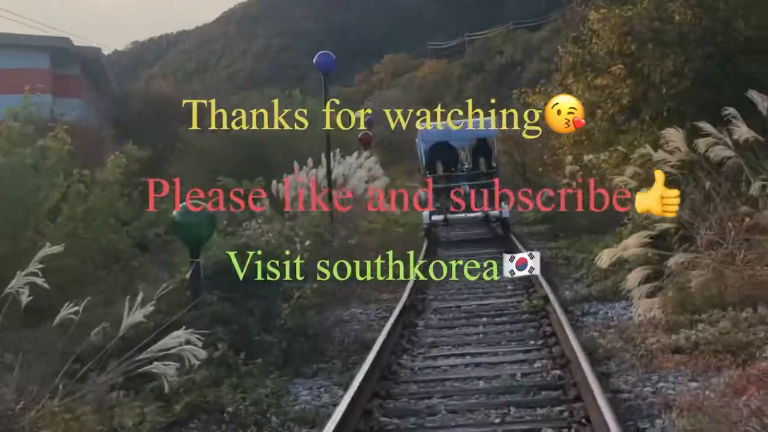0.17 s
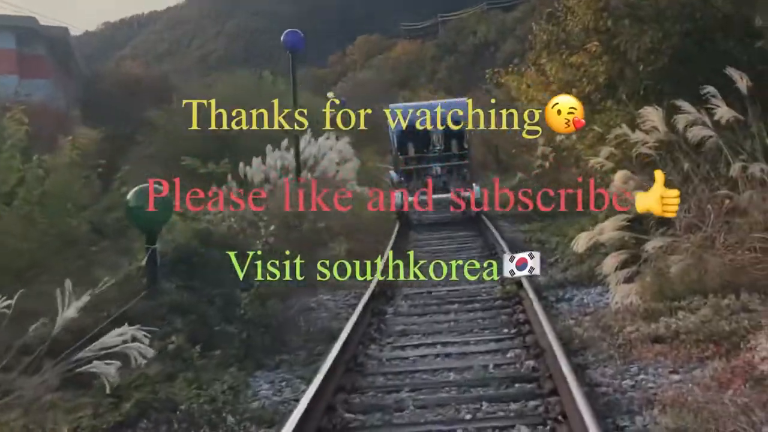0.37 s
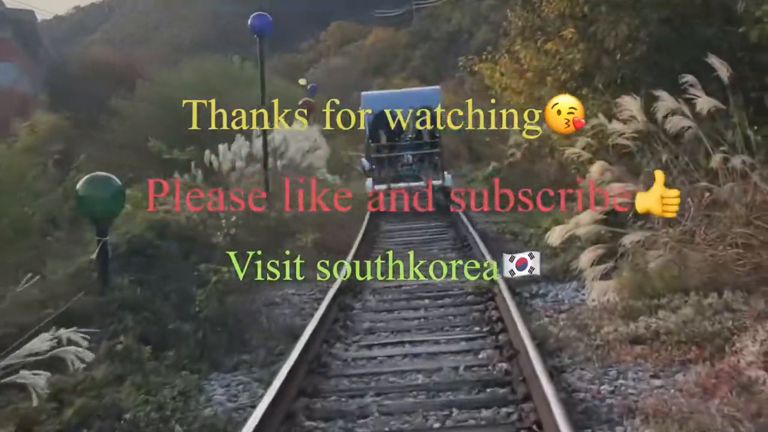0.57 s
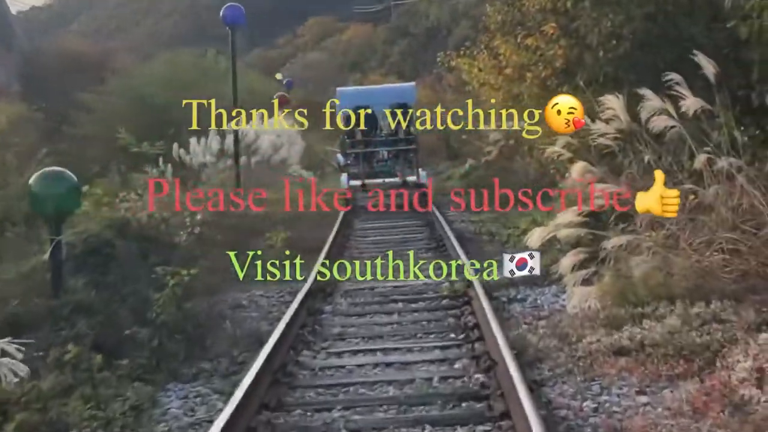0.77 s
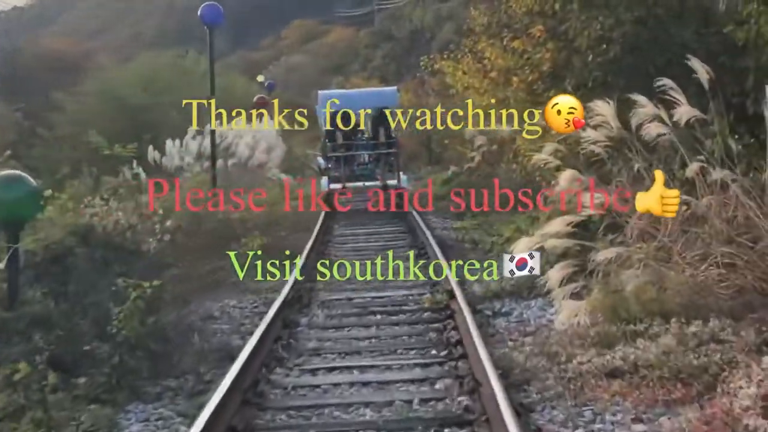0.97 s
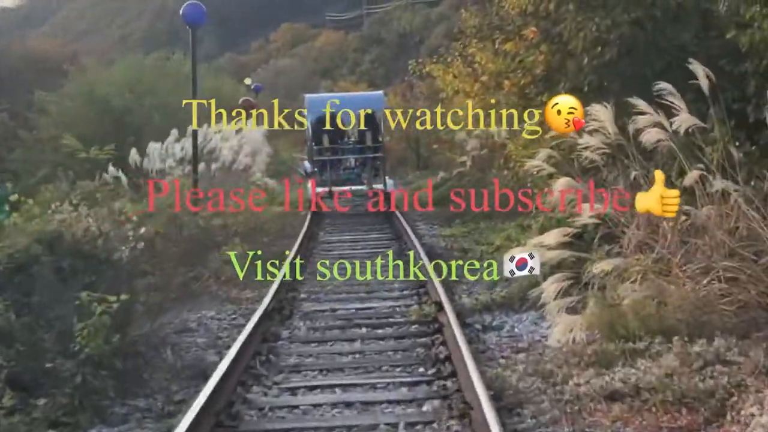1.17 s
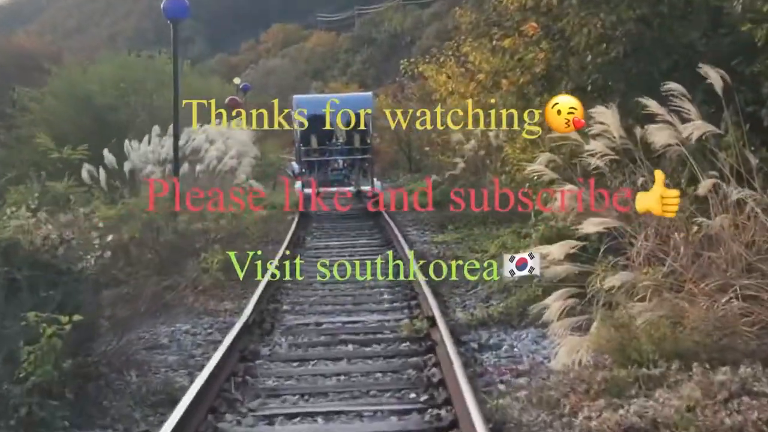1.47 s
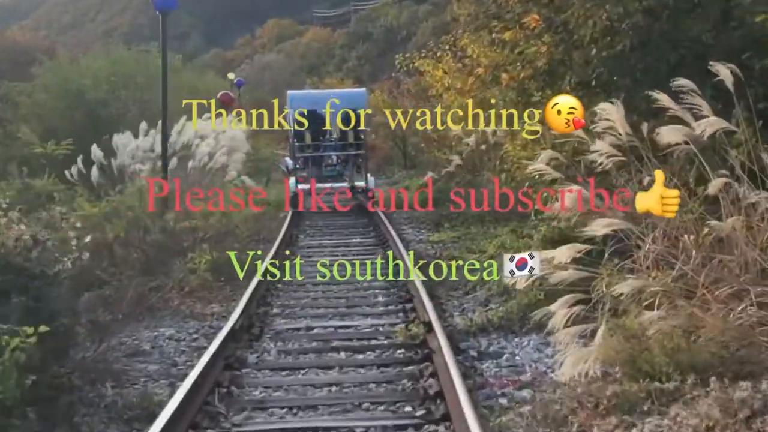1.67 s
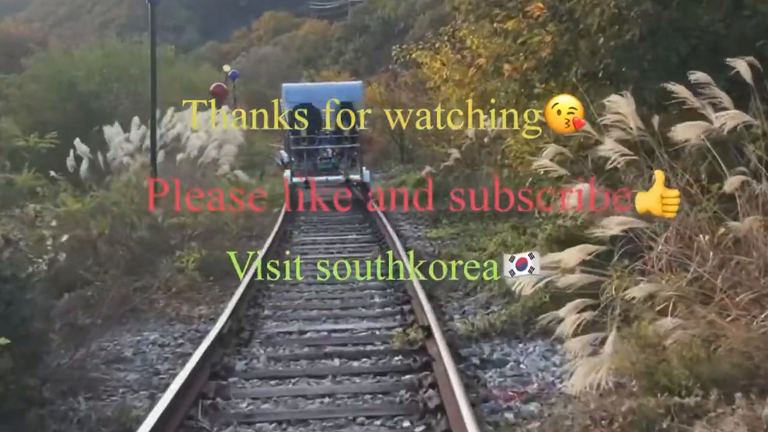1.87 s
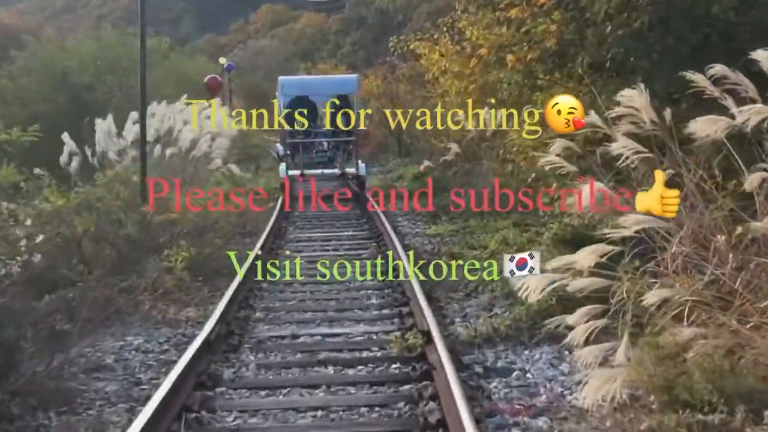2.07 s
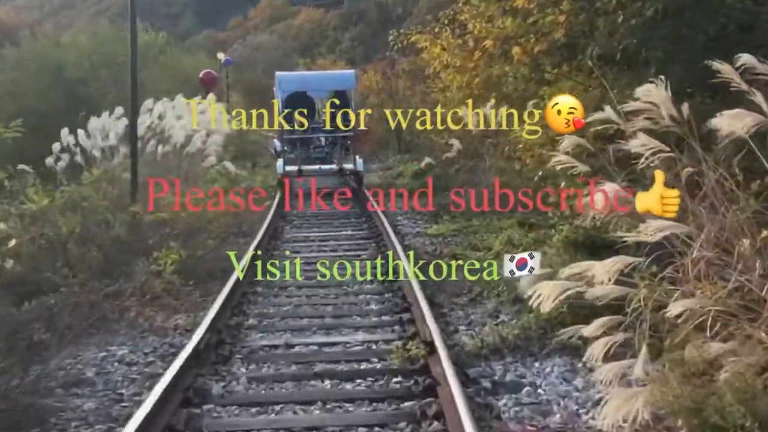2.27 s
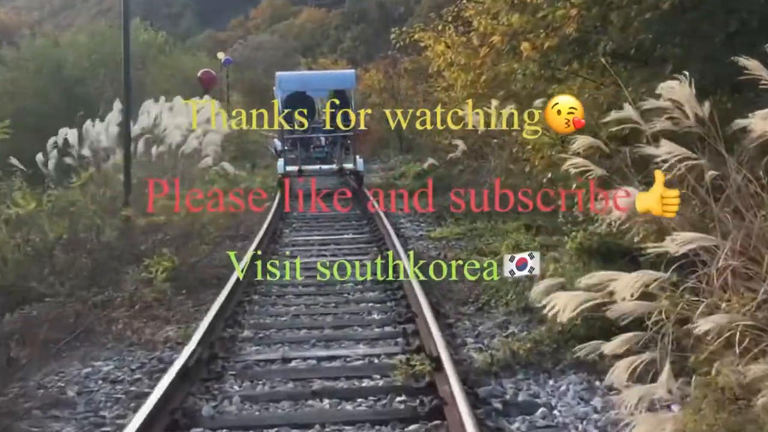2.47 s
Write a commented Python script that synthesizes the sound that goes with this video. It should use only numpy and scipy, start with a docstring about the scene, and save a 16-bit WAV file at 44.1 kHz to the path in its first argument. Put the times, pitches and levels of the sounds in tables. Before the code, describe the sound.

Close to one microphone in the open, a light rail cart rumbles and hums throughout; loose metal clacks at the start, a wheel thuds over a joint halfway, more rattles follow, then a brief high squeak.

```python
"""A low hum and rumble with ringing steel wheels: aboard a pedal cart on a country railway, close to one microphone.
Wavering tones in narrow noise make the frame's hum, coloured noise its rumble; gritty noise rings the wheels' modes.
Loose parts clack (noise bursts and ringing modes), tick, scuff and ping; single wheel tones swell up briefly.
A wheel knocks in a rail joint (decaying sines), and late on a dry joint squeaks (roughened metal modes)."""
import sys
import numpy as np
from scipy import signal
from scipy.fft import rfft, irfft, next_fast_len
from scipy.io import wavfile
from scipy.ndimage import map_coordinates

SR = 44100
rng = np.random.default_rng(int(sys.argv[2]) if len(sys.argv) > 2 else 0)


def output_pcm(signal):
    """Save a mono or channel-first signal as 16-bit PCM at the path in sys.argv[1].

    Samples are clipped to [-1, 1] before scaling.
    """
    pcm = np.clip(np.atleast_2d(signal).T, -1, 1) * 32767
    wavfile.write(sys.argv[1], SR, np.round(pcm).astype(np.int16))


def elevation(decibels):
    """Turn decibel levels (scalar or array-like) into linear amplitude ratios."""
    levels = np.asarray(decibels, float)
    return 10 ** (levels / 20)


N = 115983
T = np.arange(N) / SR


def unit(x):
    """Scales x to an rms of 1."""
    return x / np.sqrt(np.mean(x ** 2) + 1e-20)


def wobble(rate):
    """A smooth random curve with rate knots a second."""
    knots = rng.standard_normal(int(N * rate / SR) + 4)
    return map_coordinates(knots, [T * rate])


def filtered(x, response):
    """x shaped by a complex response of frequency."""
    m = next_fast_len(N + SR // 2)
    return irfft(rfft(x, m) * response(np.fft.rfftfreq(m, 1 / SR)), m)[:N]


def colour(points):
    """Gain drawn through (f/Hz, level/dB) points on a log frequency axis."""
    f, db = np.transpose(points)
    return lambda hz: elevation(np.interp(np.log(hz + 1), np.log(f), db))


def resonances(modes):
    """Causal response of (f/Hz, width/Hz, level/dB) resonances, with alternating signs."""
    def response(f):
        total = 0
        for k, (centre, width, db) in enumerate(modes):
            damping = 1j * f * width
            total = total + (-1) ** k * elevation(db) * damping / (centre * centre - f * f + damping)
        return total
    return response


def curves(rows):
    """One value per sample for each column after the time."""
    s, *cols = np.transpose(rows)
    return [np.interp(T, s, c) for c in cols]


def bursts(rows, points, rise_s):
    """Coloured noise that jumps up at each (t/s, level/dB, t60/s) and dies away."""
    envelope = np.zeros(N + SR)
    t = T[:SR // 4]
    for s, db, t60 in rows:
        decay = elevation(db - 60 * t / max(t60, .004))
        envelope[round(s * SR):][:len(t)] += decay * (1 - np.exp(-t / rise_s))
    return envelope[:N] * unit(filtered(rng.standard_normal(N), colour(points)))


def drone(rows, noise_db, width_hz, waver_hz):
    """A frame mode kept ringing: a tone of wandering pitch in narrow noise, noise_db against the tone."""
    hz, db = curves(rows)
    tone = np.sqrt(2) * np.sin(2 * np.pi * np.cumsum(hz + waver_hz * wobble(16)) / SR)
    narrow = resonances([(hz.mean(), width_hz, 0)])
    # the resonance is applied twice, for steeper skirts
    noise = unit(filtered(rng.standard_normal(N), lambda f: narrow(f) ** 2))
    return elevation(db) * unit(tone + elevation(noise_db) * noise)


def scrape(s, hz, db, t60, rise_s):
    """One metal mode rubbed into a ring, rough in level and pitch, that swells and dies."""
    rough_db, rough_pitch, rough_per_s = 4, .018, 650  # pitch as a fraction of hz
    t = (T - s).clip(0)
    phase = 2 * np.pi * hz * np.cumsum(1 + rough_pitch * wobble(rough_per_s)) / SR
    level = elevation(db - 60 * t / t60 + rough_db * wobble(rough_per_s))
    swell = 1 - np.exp(-(2 * t / rise_s) ** 2)
    return level * swell * np.sin(phase)


def frame_hum():
    """The shaken frame keeps three of its modes ringing: hum, boom and a broad drumming."""
    # Wandering rings of the frame, lowest first: t/s, f/Hz, level/dB
    hum_path = [(0.0, 109, -58), (0.09, 111.4, -37), (0.25, 112, -25), (0.28, 115, -42),
                (0.34, 103.4, -25.5), (0.39, 106.7, -54), (0.45, 112.7, -27), (0.5, 112.5, -36),
                (0.56, 111.9, -26), (0.6, 111.7, -30.5), (0.78, 105.4, -25.5), (0.8, 105, -40),
                (0.86, 105.2, -30), (0.89, 106.5, -46), (0.97, 105.4, -27), (0.98, 105.5, -41),
                (1.03, 113, -31), (1.11, 109.7, -45), (1.13, 111.2, -31), (1.17, 104.2, -42),
                (1.22, 109.8, -28), (1.49, 112.7, -32), (1.54, 117.5, -37), (1.69, 111.0, -27),
                (1.82, 111.5, -21), (1.85, 112, -30.5), (2.05, 117.7, -35.5), (2.09, 112.1, -34),
                (2.15, 111.3, -30), (2.23, 114.9, -34), (2.31, 110.4, -22), (2.37, 110.8, -38),
                (2.39, 109.0, -24.5), (2.45, 103, -31), (2.57, 103.1, -32.5), (2.63, 108.5, -29)]
    boom_path = [(0.0, 226.5, -33.5), (0.08, 244, -30.5), (0.12, 260.4, -42), (0.19, 241.2, -26.5),
                 (0.21, 250.3, -49), (0.23, 240.1, -25.5), (0.36, 247.4, -50), (0.38, 236.6, -27),
                 (0.53, 234.5, -26.5), (0.56, 247, -18.5), (0.61, 254.7, -41), (0.64, 258.5, -20.5),
                 (0.73, 260.0, -39), (0.82, 226.9, -26), (0.94, 227.2, -33), (1.03, 251, -26.5),
                 (1.11, 259.6, -39), (1.12, 249.5, -19), (1.16, 236.8, -38), (1.17, 229.5, -21.5),
                 (1.24, 228.6, -31), (1.31, 229.3, -29), (1.37, 249.5, -39), (1.41, 226.2, -29),
                 (1.47, 216.9, -45), (1.56, 247.4, -22.5), (1.58, 250.4, -49), (1.65, 241, -12),
                 (1.66, 239.3, -42), (1.68, 238.5, -15), (1.73, 252, -33), (1.74, 255.7, -16.5),
                 (1.77, 253, -31), (1.79, 244.8, -20.5), (1.86, 244.5, -24.5), (1.95, 225.7, -26.5),
                 (2.12, 235, -32), (2.23, 215.6, -30), (2.34, 243.9, -43), (2.39, 241.3, -18.5),
                 (2.41, 239.6, -38), (2.49, 257.7, -20.5), (2.53, 258.4, -50), (2.54, 255.2, -18),
                 (2.62, 261.3, -40), (2.63, 263, -29)]
    drum_path = [(0.0, 450, -34), (0.15, 496.4, -32.5), (0.68, 515.7, -32.5), (0.78, 556.3, -29),
                 (0.83, 445.7, -30), (0.91, 526.4, -29), (1.1, 490.8, -33), (1.12, 549, -36),
                 (1.21, 537.7, -25.5), (1.27, 455.5, -36), (1.3, 521.3, -24.5), (1.34, 448.6, -35.5),
                 (1.38, 522.2, -39.5), (1.49, 509.7, -24.5), (1.57, 569, -32), (1.6, 498.7, -27.5),
                 (1.84, 489.3, -31.5), (1.88, 447, -34), (1.98, 503.6, -29.5), (2.17, 518.2, -24.5),
                 (2.2, 446.4, -30.5), (2.35, 566, -35.5), (2.4, 504.7, -30.5), (2.51, 561.2, -30.5),
                 (2.59, 472.2, -44), (2.63, 551.6, -37)]
    hum = drone(hum_path, noise_db=-9, width_hz=26, waver_hz=2)
    boom = drone(boom_path, noise_db=-8, width_hz=50, waver_hz=4)
    drum = drone(drum_path, noise_db=-3, width_hz=90, waver_hz=10)
    return hum + boom + drum


def wheel_ring():
    """Even roughness and random bumps on the tread drive the wheel modes, each singing up on its own."""
    # Wheel modes, relative levels: f/Hz, width/Hz, level/dB
    wheel_modes = [(1863, 85, 1.5), (2048, 87, 2), (2113, 97, 0.5), (2254, 170, -0.5), (2440, 100, 1),
                   (2494, 60, -0.5), (2635, 24, -1.5), (3144, 110, -12), (3470, 93, -9.5), (3750, 120, -8),
                   (4630, 21, -12), (4800, 57, -39), (5590, 91, -16)]
    grit_per_s, grit_spread_db, grit_db = 540, 2.5, -5  # grit_db is against the even roughness
    swell_db, swells_per_s = 2.8, 45
    bumps = rng.random(N) < grit_per_s / SR
    sizes = elevation(grit_spread_db * rng.exponential(1, N).clip(0, 3.5))
    grit = bumps * sizes * rng.choice([-1, 1], N)
    tread = rng.standard_normal(N) + elevation(grit_db) * unit(grit)
    ring = np.zeros(N)
    for k, mode in enumerate(wheel_modes):
        drive = tread * elevation(swell_db * wobble(swells_per_s))
        ring += (-1) ** k * filtered(drive, resonances([mode]))
    return unit(ring)


def rolling():
    """Rough wheels rolling: the frame's hum and noisy rumble, the wheel ring, a hiss and a flickering treble."""
    # Course of the rolling: t/s, rumble level/dB, wheel ring and hiss level/dB, treble level/dB
    roll = [(0.0, -26.5, -43, -53), (0.04, -28, -45, -51.5), (0.28, -25, -44.5, -53.5),
            (0.48, -28, -41.5, -50), (0.51, -21.5, -42.5, -52), (0.61, -28.5, -45, -53),
            (0.79, -23, -43, -52), (0.83, -28.5, -41, -51.5), (0.92, -21, -43.5, -52),
            (0.94, -26, -42.5, -52), (1.32, -23.5, -42.5, -51), (1.35, -26, -41.5, -55),
            (1.49, -25, -43, -52), (2.63, -25, -40.5, -51)]
    # Noise colours: f/Hz, level/dB
    rumble_colour = [(20, -38), (45, -19.5), (70, -23.5), (90, -6.5), (140, -6.5), (175, -4), (210, -2),
                     (290, -6.5), (400, -6), (460, -2.5), (515, -5), (570, -4.5), (620, -12.5), (680, -18),
                     (850, -21.5), (1100, -29), (1600, -36), (2000, -59)]
    hiss_colour = [(500, -50), (900, -6.5), (1600, -5.5), (3000, -13), (5500, -13), (6500, -19.5),
                   (8000, -34)]
    treble_colour = [(4000, -10), (6500, 0.5), (8000, -1), (10000, -1), (13000, -6.5), (16000, -2.5)]
    rumble_db, ring_db, treble_db = curves(roll)
    noise = rng.standard_normal((3, N))
    rumble = unit(filtered(noise[0] * elevation(0.41 * wobble(29.9)), colour(rumble_colour)))
    # the hiss lies about 2.5 dB under the ring
    hiss = unit(filtered(noise[1], colour(hiss_colour))) * elevation(-2.5 + 1.2 * wobble(70))
    flicker_db = 1.6 * wobble(17) + 1.2 * wobble(82)
    treble = unit(filtered(noise[2], colour(treble_colour))) * elevation(treble_db + flicker_db)
    return frame_hum() + elevation(rumble_db) * rumble + elevation(ring_db) * (wheel_ring() + hiss) + treble


def clacks():
    """Each clack is a dull burst that also rings the part's modes, a little differently every time."""
    # Clacks of loose parts: t/s, level/dB, t60/s (of the burst)
    clack_rows = [(0.011, -40, 0.03), (.034, -36, 0.054), (0.041, -26, 0.039), (0.046, -38, .04),
                  (.050, -35.5, .05), (0.25, -32, 0.02), (1.076, -34.5, 0.053), (1.084, -37, .04),
                  (1.094, -33, 0.035), (1.303, -36, 0.04), (1.395, -39.5, 0.064), (1.656, -32.5, 0.035),
                  (1.723, -25, 0.025), (1.729, -41, .04), (1.737, -38, 0.038), (2.554, -32, 0.074)]
    # Colour of the burst: f/Hz, level/dB
    clack_colour = [(600, -4.5), (950, -8), (1150, 2.5), (1400, 6.5), (1750, -4.5), (2500, -1),
                    (3000, -7.5), (3550, -8), (4000, -11), (4550, -8.5), (5500, -8), (7500, -22.5),
                    (12000, -43)]
    # Modes of the part, before their random spread: f/Hz, level/dB, t60/s
    clack_modes = [(1110, 4, 0.045), (1383, 0, 0.035), (1744, -7, 0.03), (2510, -12, 0.03),
                   (3600, -4, 0.05), (4450, -4, 0.04)]
    rise_s, ring_db = .0008, -4
    out, t = np.zeros(N + SR), T[:SR // 8]
    chance = rng.standard_normal((len(clack_rows), len(clack_modes), 2))
    for (s, db, t60), draws in zip(clack_rows, chance):
        ring = np.zeros(len(t))
        for (hz, level, ring_s), (a, b) in zip(clack_modes, draws):
            decay = elevation(level + 2.9 * a - 60 * t / ring_s)
            ring += decay * np.sin(2 * np.pi * hz * (1 + 0.021 * b) * t)
        out[round(s * SR):][:len(t)] += elevation(db + ring_db) * ring * (1 - np.exp(-t / rise_s))
    return out[:N] + bursts(clack_rows, clack_colour, rise_s)


def rattles():
    """Loose parts tick (bright noise bursts) or scuff (soft noise strokes); many faint ticks fall at random."""
    # Single ticks: t/s, level/dB, t60/s
    tick_rows = [(.014, -36, .02), (.040, -24, 0.015), (.195, -42, 0.023), (.460, -40, 0.017),
                 (.733, -43, 0.036), (.793, -37, 0.025), (.957, -40, 0.031), (1.077, -46, 0.025),
                 (1.250, -43, 0.041), (1.723, -27.5, 0.024), (2.025, -45, 0.031), (2.221, -40, 0.021),
                 (2.259, -39, 0.041), (2.276, -39, 0.029), (2.314, -43, .025), (2.391, -34.5, 0.027),
                 (2.481, -36, 0.022), (2.498, -32, .018), (2.597, -44, 0.033)]
    # Colour of ticks and scuffs: f/Hz, level/dB
    tick_colour = [(1500, -37), (4000, 0), (8000, -1), (12000, -3), (16000, -4.5)]
    # Soft bright scuffs: middle t/s, length/s, level/dB
    scuff_rows = [(0.554, 0.064, -53), (0.883, 0.059, -51), (1.084, .014, -54), (1.093, 0.027, -50),
                  (1.397, 0.041, -51.5), (1.647, 0.044, -44.5), (1.746, 0.039, -47), (1.779, 0.031, -51),
                  (2.045, 0.029, -48), (2.16, 0.027, -48.5), (2.568, 0.078, -47)]
    small_per_s, small_db, small_spread_db, small_t60 = 40, -53, 2.5, .03  # small_db is the faintest
    draw = rng.random((200, 2))
    times = np.cumsum(-np.log(1 - draw[:, 0])) / small_per_s
    levels = small_db - small_spread_db * np.log(1 - draw[:, 1])
    small = [(s, db, small_t60) for s, db in zip(times, levels) if s < N / SR]
    ticks = bursts(tick_rows + small, tick_colour, rise_s=.0012)
    stroke = sum(elevation(db) * np.exp(-(2 * (T - s) / length) ** 2) for s, length, db in scuff_rows)
    stroke = stroke * elevation(2.9 * wobble(150))
    return ticks + stroke * unit(filtered(rng.standard_normal(N), colour(tick_colour)))


def pings():
    """Thin metallic pings: single rough modes that swell and die."""
    # Pings: t/s, f/Hz, level/dB, t60/s
    ping_rows = [(.047, 9400, -44, .05), (.243, 4900, -44, .05), (.250, 5200, -38, .075),
                 (.248, 10600, -53, .12), (.920, 9100, -46, .1), (1.296, 10800, -46, .06),
                 (2.036, 11800, -39, .09), (2.038, 11200, -48, .05), (2.053, 9500, -44, .045),
                 (2.479, 8100, -46, .045)]
    return sum(scrape(*ping, rise_s=.006) for ping in ping_rows)


def singing():
    """Single wheel modes sing up clearly: short soft swells of pure tone."""
    # Swells: middle t/s, f/Hz, level/dB
    sing_rows = [(.302, 1960, -35), (0.763, 2000, -34.5), (.898, 2080, -37), (1.228, 2440, -37),
                 (1.280, 2040, -46), (1.946, 1910, -36), (2.012, 1900, -33.5), (2.220, 2420, -34),
                 (2.249, 1960, -36), (2.466, 2450, -34)]
    length_s = 0.016
    out = np.zeros(N)
    for s, hz, db in sing_rows:
        swell = np.exp(-(2 * (T - s) / length_s) ** 2)
        out += elevation(db) * swell * np.sin(2 * np.pi * hz * T)
    return out


def rail_joint():
    """A wheel drops into a rail joint and knocks the frame's low modes into decaying sines."""
    # Knocks: t/s, level/dB
    thud_rows = [(1.2995, -11)]
    # Modes knocked, levels on top of the knock's: f/Hz, level/dB, t60/s
    thud_modes = [(116, -14, .12), (205, -1, .08), (490, 2, .07)]
    out = np.zeros(N)
    for s, db in thud_rows:
        t = (T - s).clip(0)
        rise = 1 - np.exp(-t / 0.0033)
        for hz, level, t60 in thud_modes:
            out += elevation(db + level - 60 * t / t60) * np.sin(2 * np.pi * hz * t) * rise
    return out


def squeak():
    """A dry joint slips for a moment and rubs a set of metal modes into a squeak."""
    # Modes of the squeak: f/Hz, level/dB, t60/s, start after the slip/s (negative is early)
    squeak_modes = [(4780, -27, .085, .001), (5020, -26, .04, -.001), (4480, -36, .04, 0),
                    (9300, -28, .055, .004), (9870, -37, .05, .002), (10150, -33, .035, -.001),
                    (13550, -41, .04, .001), (14250, -46, .045, .003), (14900, -49, .04, .002)]
    slip_at_s, slip_s = 2.519, .01
    out = np.zeros(N)
    for hz, db, t60, late in squeak_modes:
        lift_db = 60 * slip_s / 2 / t60  # makes up for the decay up to mid-slip
        out += scrape(slip_at_s + late, hz, db + lift_db, t60, slip_s)
    return out


def scene():
    """Everything, close to one microphone in the open."""
    return (rolling() + clacks() + rattles() + pings() + singing() + rail_joint() + squeak())[None]


def top_cut(x):
    """Nothing passes above the cut-off."""
    return signal.sosfilt(signal.butter(12, 15760, fs=SR, output="sos"), x)


def record(dry):
    """The camera's band limit: nothing passes from 15780 Hz up."""
    mix = filtered(dry[0], lambda hz: hz < 15780)[None]
    return top_cut(mix)


dry = scene()
out = record(dry)
output_pcm(out)
```